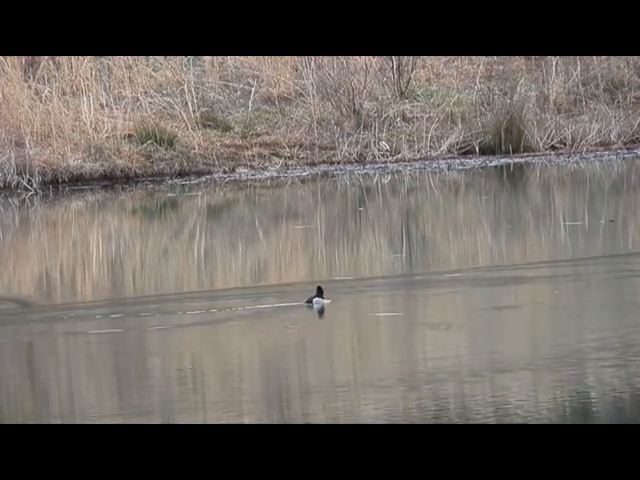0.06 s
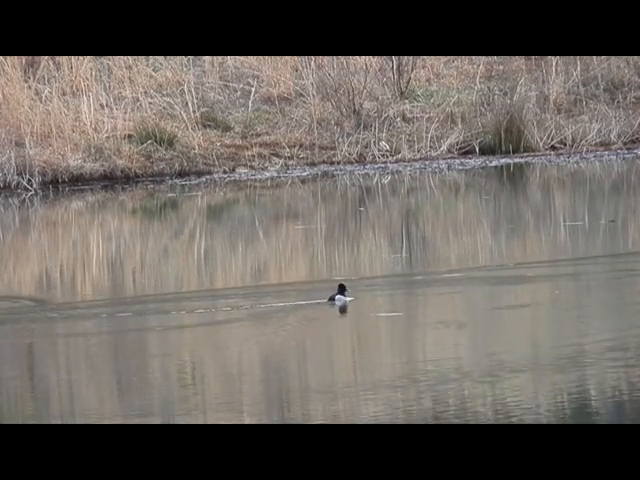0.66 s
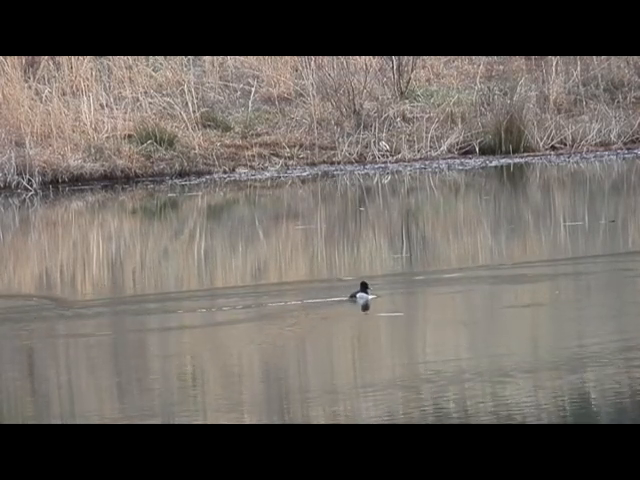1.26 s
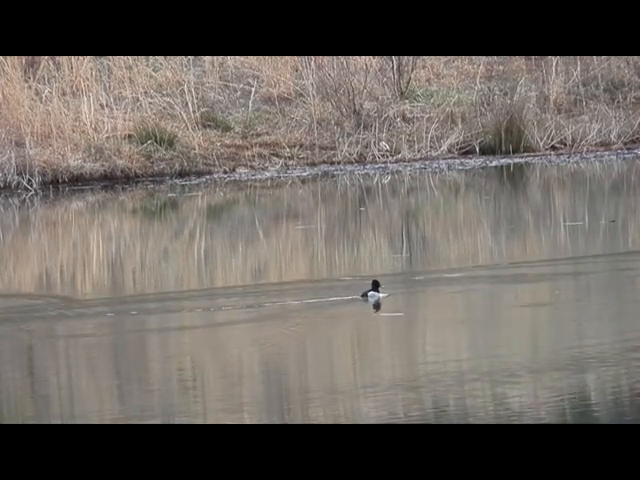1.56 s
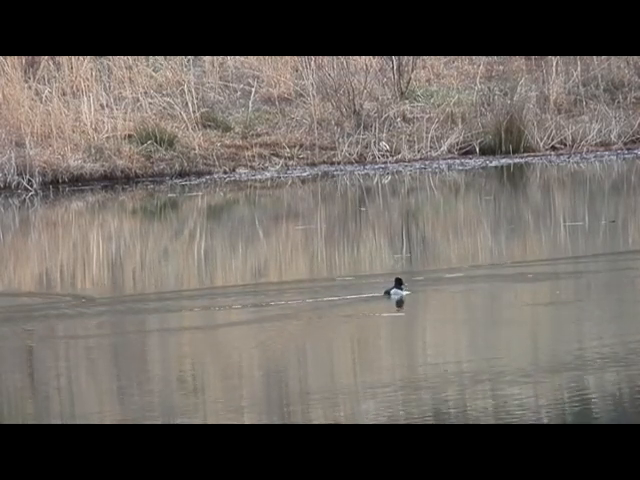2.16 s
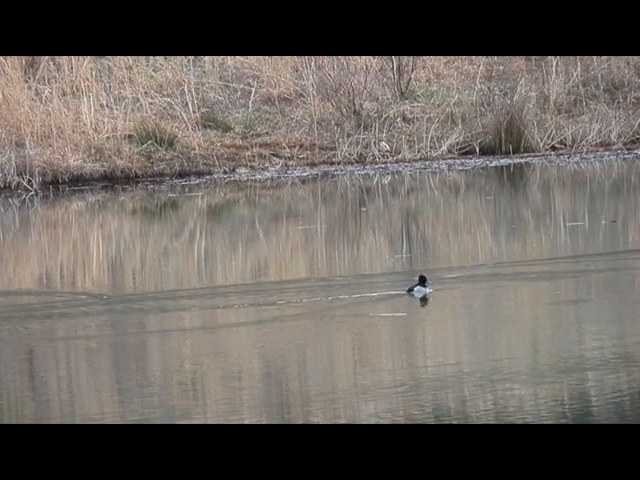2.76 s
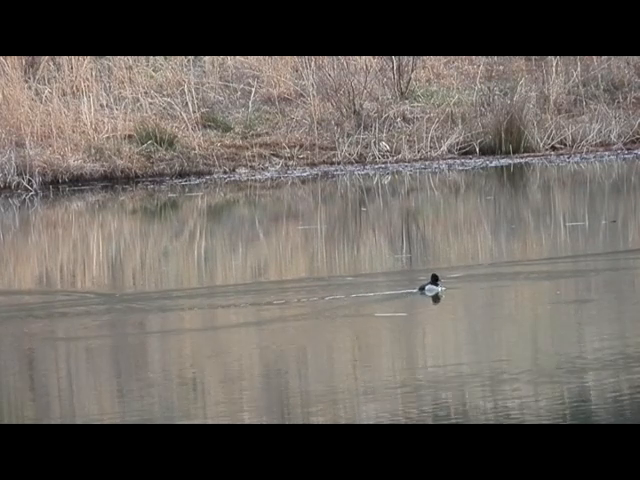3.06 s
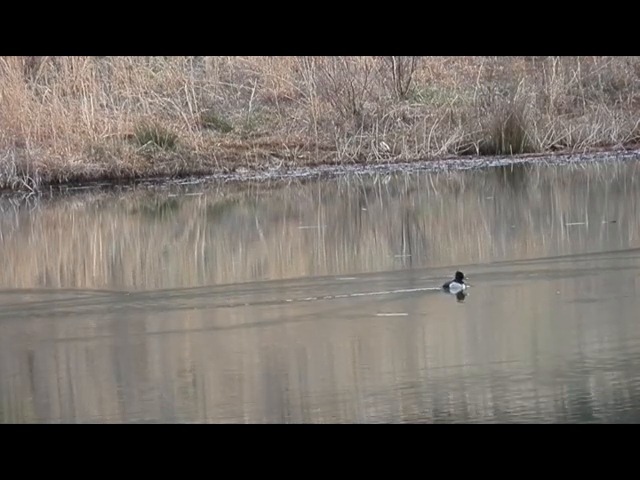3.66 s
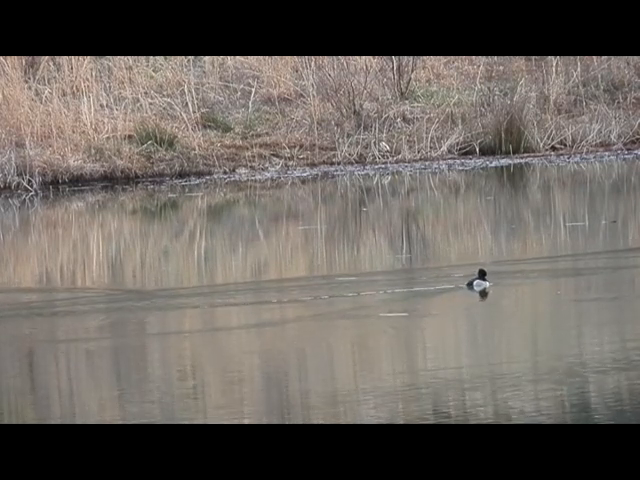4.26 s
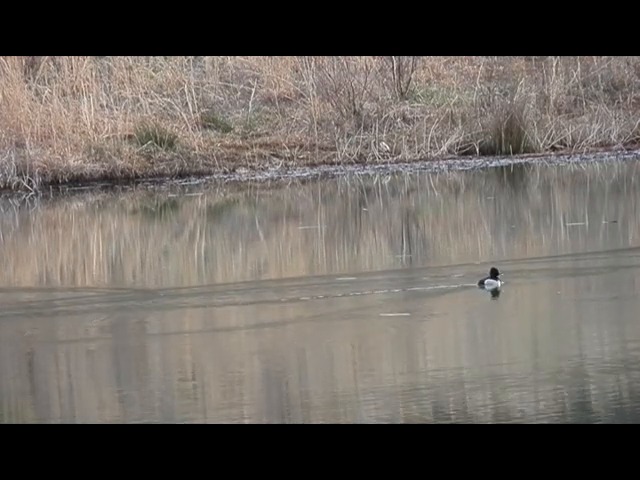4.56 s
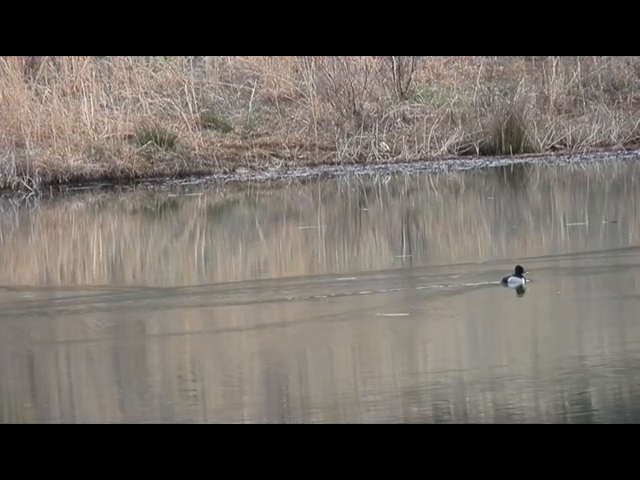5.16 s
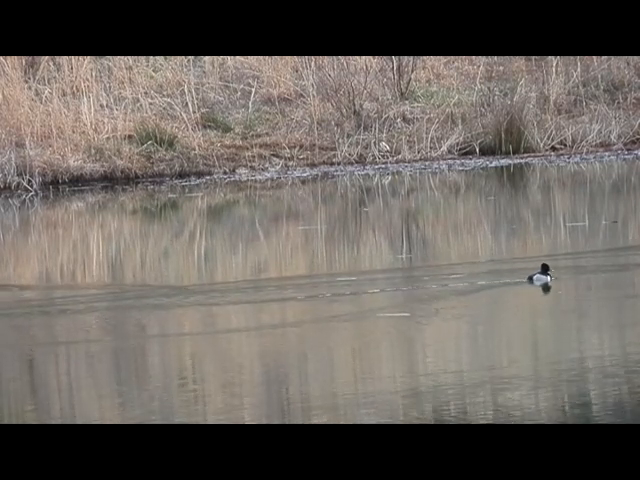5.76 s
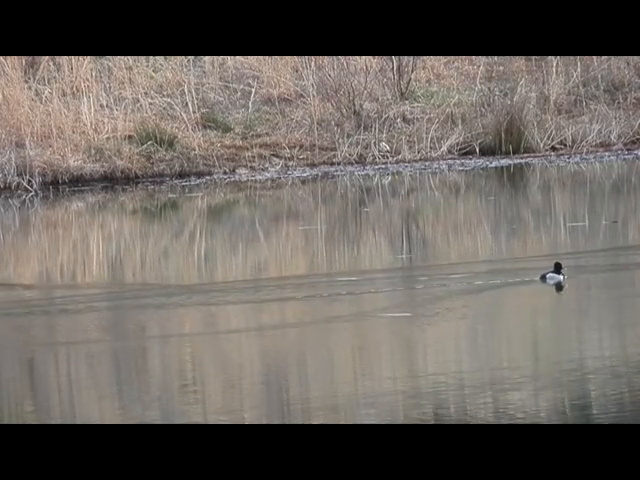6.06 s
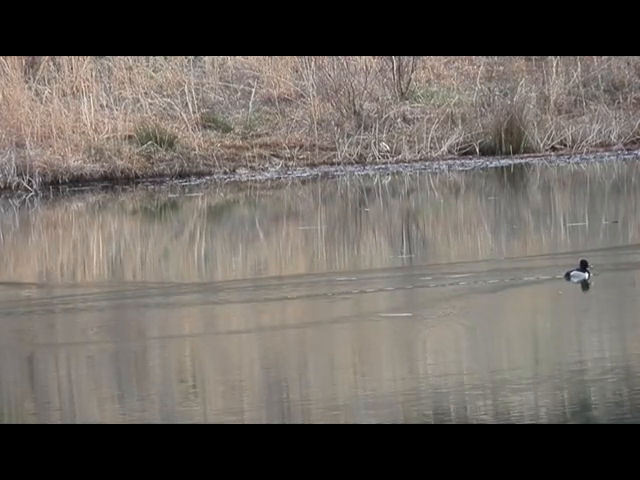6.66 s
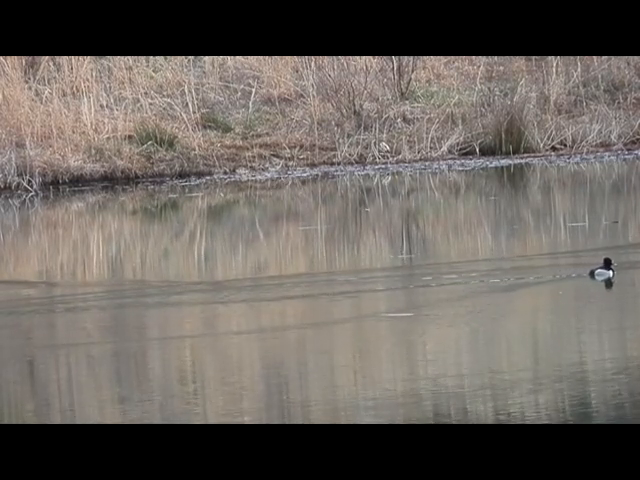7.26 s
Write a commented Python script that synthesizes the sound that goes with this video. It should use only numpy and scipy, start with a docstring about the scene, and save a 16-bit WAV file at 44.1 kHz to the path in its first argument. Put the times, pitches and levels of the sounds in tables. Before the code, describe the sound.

Several toads trill throughout at a pond, their fast pulsing tones overlapping at slightly different pitches. Early on, a close sparrow sings one song: raspy chips, a buzz, quick pips, two loud diving whistles and sharp closing notes. A farther bird faintly repeats a falling call before the song and again afterwards. A few tiny bubbles plop, over a low distant rumble and thin hiss in the open air.

```python
"""Six toads trill around a pond, each vocal sac ringing in pulses at its own pitch and pace.
Close by, a sparrow's syrinx sings one song: raspy chips, a buzz, pips, flicks and steep whistles.
A farther bird repeats a falling slur among faint notes and rasps; bubbles plop at the water's edge.
Reeds and trees scatter the calls, over a whirr of far toads, a low distant rumble and a thin hiss."""
import sys
import numpy as np
from scipy import signal
from scipy.fft import rfft, irfft
from scipy.io import wavfile
from scipy.ndimage import uniform_filter1d

SR = 44100
rng = np.random.default_rng(int(sys.argv[2]) if len(sys.argv) > 2 else 0)


def unload_audio(sound):
    """Save the sound as a 16-bit wav file, at the path given as the first command line argument."""
    columns = np.transpose(np.atleast_2d(sound))
    # keep every value between -1 and 1, then stretch to whole-number steps
    steps = np.round(np.clip(columns, -1, 1) * 32767)
    wavfile.write(sys.argv[1], SR, steps.astype(np.int16))


N = 331632
TIME = np.arange(N) / SR
ALONG = np.linspace(0, 1, 48)   # position within a note, from start to end

# tone colours of the four noise beds: (frequency [Hz], relative density [dB])
RUMBLE_SPECTRUM = [(20, -7.5), (35, -2.5), (65, -0.5), (105, -0.5), (155, -1), (210, -6.5), (290, -16)]
FAR_NOISE_SPECTRUM = [(220, 2), (320, 0.5), (450, -3), (600, -7.5), (780, -8.5), (950, -19), (1150, -26)]
HISS_SPECTRUM = [(1100, 6), (1500, 9.5), (2000, -9), (3000, -7), (4000, -16), (5500, -9.5), (8000, -6.5),
                 (11000, -3), (14000, 0), (16500, -1)]
WHIRR_SPECTRUM = [(1300, -27), (1380, -8.5), (1440, -5.5), (1495, -7.5), (1555, -2.5), (1630, -4),
                  (1700, -22.5), (1780, -39.5)]
# the rumble's slow swell: (time [s], level [dB])
RUMBLE_LEVELS = [(0, -55), (1, -53), (2.5, -55), (4, -54.5), (5, -56), (6.2, -52.5), (7.5, -54.5)]
# bubbles at the water's edge: (time [s], pitch [Hz], level before the attack boost [dB])
BUBBLES = [(.5, 740, -66), (1.67, 780, -64.5), (4.465, 795, -62.5), (5.29, 830, -67), (5.694, 1082, -63),
           (5.697, 810, -62), (5.75, 1010, -65), (7.37, 1070, -68)]

# the far bird's slurs: (time [s], level [dB])
SLUR_CALLS = [(1.077, -70), (1.383, -68), (1.696, -68.5), (2.0, -67), (4.994, -69.5), (5.295, -66.5),
              (5.599, -66.5), (5.906, -67.5)]
# contour of one slur: (time offset [s], pitch [Hz], level offset [dB])
SLUR_SHAPE = [(-.02, 3097, -17), (.005, 2934, 3.5), (.048, 2908, 1.5), (.068, 2650, 3.5),
              (.095, 2184, -2.5)]
# faint notes from the trees:
# (time [s], length [s], start pitch [Hz], middle pitch [Hz], end pitch [Hz], level [dB], overtone [dB])
TREE_NOTES = [(3.616, 0.036, 2150, 2100, 1950, -59.5, -2), (5.742, 0.077, 2280, 2300, 2240, -67, -24),
              (6.38, .11, 7300, 7650, 8900, -71, -24)]
# runs of soft, distant rasps; the last is the far slur's fading echo:
# (time [s], count, spacing [s], pitch [Hz], level [dB], fade [dB/rasp])
FAR_RASPS = [(.08, 3, .13, 4190, -72.5, 2), (3.439, 1, .1, 2840, -68.5, 0),
             (3.721, 7, .114, 4170, -69, 1.6), (6.08, 3, 0.057, 2650, -70.5, 4)]

# one trill per toad: (start [s], end [s], rate [pulses/s], slowing [pulses/s^2])
TOAD_TRILLS = [(.016, 3.62, 17.98, .21), (3.678, 8.2, 19.34, .152), (.046, 8.2, 20.33, .076),
               (2.246, 8.2, 20.76, .288), (.006, 8.2, 17.0, .174), (4.44, 8.2, 19.03, .7)]
# the same toads' voices: (pitch [Hz], glide [Hz/s], level [dB], swell [dB/s], pulse length [s],
# fall within a pulse [Hz], 2nd harmonic [dB], 3rd harmonic [dB], echo [dB])
TOAD_VOICES = [(1420.5, -4, -47, -.5, .029, 38, -30, -24.5, -9.5),
               (1429, 4, -54, -0.2, 0.024, 60, -25, -35, -7),
               (1535, 3.5, -55.5, -0.1, .032, 49.5, -42.5, -33.5, -2),
               (1654, 2.5, -58.5, .5, 0.019, 70, -41.5, -41.5, -6),
               (1613, 0.67, -57.5, 0.04, .031, 45, -20.5, -28, -7),
               (1563, 4.5, -57, .1, 0.024, 55, -37, -28, -15)]

# the sparrow's two-voiced chips: (time [s], low voice [dB], high voice [dB])
CHIP_CALLS = [(1.458, -62.5, -56.5), (1.713, -56.5, -38.5), (1.84, -56.5, -49), (2.014, -52, -45.5)]
# contours of a chip's two voices: (time offset [s], pitch [Hz], level offset [dB])
CHIP_LOW_SHAPE = [(0, 3314, -9), (.013, 3263, 0.5), (.04, 3130, -5.5), (.07, 2880, -13)]
CHIP_HIGH_SHAPE = [(.012, 5660, -23), (.021, 5330, -9.5), (.033, 5490, -3.5), (.046, 5420, -5.5),
                   (.06, 5350, -8), (.07, 5510, -22.5)]
# two loud diving whistles: (time [s], length [s], top pitch [Hz], level [dB])
DIVE_NOTES = [(2.644, 0.076, 7700, -24), (3.082, 0.083, 7720, -21.5)]
# hooks, each a rise and then a short fall: (time [s], rise length [s], top pitch [Hz], snap [dB],
# crest [dB], fall time [s], fall pitch [Hz], fall depth [Hz], fall level [dB])
HOOK_NOTES = [(2.114, 0.036, 7580, -48.5, -44, 2.159, 5270, 595, -43),
              (3.504, 0.036, 8110, -42, -52, 3.546, 5760, 1710, -39.5),
              (3.687, 0.031, 7670, -49.5, -50.5, 3.724, 5380, 1680, -48.5),
              (3.901, 0.039, 7970, -61, -54, 3.942, 5560, 1600, -50)]
# soft linking notes: (time [s], length [s], start pitch [Hz], middle pitch [Hz], end pitch [Hz], level [dB])
LINK_NOTES = [(1.937, 0.062, 6380, 6550, 6850, -67), (2.741, 0.011, 4520, 4960, 5170, -47),
              (2.75, .044, 3520, 3650, 3490, -44), (2.778, .011, 4530, 4170, 3860, -52),
              (2.83, 0.22, 2600, 2419, 2523, -50.5), (3.015, .052, 7130, 7950, 7400, -63.5),
              (3.053, .012, 7600, 7200, 6400, -58.5), (3.201, .18, 3420, 3410, 3385, -52.5),
              (3.336, 0.023, 5730, 6170, 5600, -56), (3.398, 0.018, 4700, 5000, 5300, -62),
              (3.418, 0.022, 5500, 5980, 5500, -57.5)]
# up-and-down flicks: (time [s], top pitch [Hz], level [dB])
FLICK_NOTES = [(3.195, 4370, -51), (3.218, 3800, -49), (3.236, 3890, -44), (3.252, 3790, -46),
               (3.272, 4310, -48), (3.296, 3750, -47), (3.319, 3520, -50), (3.344, 3780, -51),
               (3.361, 3450, -51), (3.378, 3900, -58)]


def from_db(db):
    return 10 ** (np.asarray(db) / 20)


def unit_rms(x):
    return x / np.sqrt(np.mean(x ** 2) + 1e-20)


def drift(rate):
    """A random wobble that takes a new turn rate times a second."""
    knots = rng.standard_normal(8192)
    return np.interp(TIME * rate, np.arange(len(knots)), knots)


def noise_bed(spectrum):
    """Noise of rms 1 with the given tone colour, rolled off beyond both ends."""
    hz, db = np.transpose(spectrum)
    f = np.maximum(np.fft.rfftfreq(N, 1 / SR), 1)
    colour = from_db(np.interp(np.log(f), np.log(hz), db))
    roll_off = 1 / np.sqrt((1 + (f / hz[-1] / 1.1) ** 24) * (1 + (hz[0] / f) ** 6))
    return unit_rms(irfft(rfft(rng.standard_normal(N)) * colour * roll_off, N))


def banks(dry, echo_db, near_t60, far_t60, far_db):
    """Reeds scatter a sound at once; the trees behind give a longer, weaker tail."""
    t = TIME[:SR]
    decay = from_db(-60 * t / near_t60) + from_db(far_db - 60 * t / far_t60)
    echo = rng.standard_normal(len(t)) * decay * np.minimum(t / .0037, 1)
    return dry + from_db(echo_db) * signal.fftconvolve(dry, echo / np.linalg.norm(echo))[:N]


def rumble():
    """A deep, distant bed that swells slowly."""
    return from_db(np.interp(TIME, *np.transpose(RUMBLE_LEVELS))) * noise_bed(RUMBLE_SPECTRUM)


def air(far_db=-63.5, hiss_db=-63):
    """Steady far-off noise above the rumble, with a thin hiss on top."""
    return from_db(far_db) * noise_bed(FAR_NOISE_SPECTRUM) + from_db(hiss_db) * noise_bed(HISS_SPECTRUM)


def far_toads(level_db=-62.5):
    """Toads on the far shore merge into a steady whirr."""
    return from_db(level_db) * noise_bed(WHIRR_SPECTRUM)


def plops(t60=.044, attack_boost_db=13):
    """Each bubble rings briefly, rising a little in pitch."""
    out, t = np.zeros(N), TIME[:SR // 8]
    for s, hz, db in BUBBLES:
        envelope = from_db(db + attack_boost_db - 60 * t / t60) * np.minimum(t / .0008, 1)
        ring = envelope * np.sin(2 * np.pi * hz * t * (1 + .54 * t))
        start = int(s * SR)
        out[start:start + len(t)] += ring[:N - start]
    return banks(out, echo_db=-14.5, near_t60=.11, far_t60=.74, far_db=-20)


def sing(out, contour, flutter_hz=0, swing_hz=0, throb=0, rasp_hz=0, overtone_db=-24, damping_db=14):
    """Mix in a note along (time [s], pitch [Hz], level [dB]); the syrinx can add flutter and rasp."""
    s, hz, db = np.transpose(contour)
    s = np.sort(s)
    span = slice(int(s[0] * SR), int(s[-1] * SR))
    t = TIME[span]
    wander = np.interp(t, np.linspace(s[0], s[-1], 24), rng.standard_normal(24))
    tremble = unit_rms(uniform_filter1d(rng.standard_normal(SR // 2), size=24))[:len(t)]
    flutter = 2 * np.pi * np.cumsum(flutter_hz * (1 + .0393 * wander)) / SR
    swing = np.sin(flutter) + np.sin(2 * flutter) / 2   # the pitch snaps up and slides down
    pitch = np.interp(t, s, hz) * (1 + .0052 * wander) + swing_hz * swing + rasp_hz * tremble
    phase = 2 * np.pi * np.cumsum(pitch) / SR
    fades = np.clip(np.minimum(t - s[0], s[-1] - t) / .002, 0, 1)
    level = np.sqrt(2) * from_db(np.interp(t, s, db)) * fades * (1 - throb * np.cos(flutter))
    # the throat takes damping_db off the octave for every kHz that the note climbs above 5 kHz
    overtone = from_db(overtone_db - damping_db * np.maximum(pitch / 1000 - 5, 0))
    out[span] += level * (np.sin(phase) + overtone * np.sin(2 * phase))


def placed(shape, s, db):
    """A note shape cued at a time and a level."""
    return np.array(shape) + [s, 0, db]


def soft_note(s, length_s, start_hz, middle_hz, end_hz, db, attack_share=.2):
    """One smooth arc of pitch that swells and then fades; long notes fade further."""
    pitch = np.polyval(np.polyfit([0, .5, 1], [start_hz, middle_hz, end_hz], 2), ALONG)
    loss_db = np.interp(ALONG, [0, attack_share, 1], [14, 0, 9 + 50 * length_s])
    return np.c_[s + length_s * ALONG, pitch, db - loss_db]


def far_slurs(slap_s=.055, slap_db=-10):
    """A far bird's falling slurs, each with one distinct reflection from the trees."""
    out = np.zeros(N)
    for s, db in SLUR_CALLS:
        sing(out, placed(SLUR_SHAPE, s, db), rasp_hz=25.1, overtone_db=-43)
        sing(out, placed(SLUR_SHAPE, s + slap_s, db + slap_db), rasp_hz=25.1, overtone_db=-40.5)
    return banks(out, echo_db=-4, near_t60=.43, far_t60=2.2, far_db=-5.5)


def far_notes_and_rasps():
    """Stray notes and soft, distant rasps, blurred by the trees."""
    out = np.zeros(N)
    for *note, overtone_db in TREE_NOTES:
        sing(out, soft_note(*note, attack_share=.43), rasp_hz=40, overtone_db=overtone_db)
    for first_s, count, gap_s, hz, first_db, fade_db in FAR_RASPS:
        for k in range(count):
            s, db = first_s + k * gap_s, first_db - k * fade_db
            contour = [(s - .035, hz + 200, db - 6), (s, hz, db), (s + .04, hz - 200, db - 4.5)]
            sing(out, contour, flutter_hz=208.7, swing_hz=400, throb=.089, rasp_hz=120)
    return banks(out, echo_db=-7, near_t60=.32, far_t60=1, far_db=-5)


def pulse_times(start_s, end_s, rate, slowing, drag_s=.026, drag_pulses=3.7):
    """A trill slows steadily as the toad tires, and its last few pulses drag further."""
    length_s = end_s - start_s
    pulse = np.arange(int(rate * length_s - slowing * length_s ** 2 / 2) + 1)
    elapsed = (rate - np.sqrt(rate ** 2 - 2 * slowing * pulse)) / slowing
    return start_s + elapsed + drag_s * np.exp((pulse - pulse[-1]) / drag_pulses)


def toad(beats, hz, glide, db, swell, pulse_s, fall_hz, second_db, third_db, arch_hz=65, tilt_db=4):
    """The vocal sac rings once a pulse, strongest early; pitch arches and sags with the push of air."""
    age = TIME - beats[0]
    nearest = np.searchsorted((beats[1:] + beats[:-1]) / 2, TIME)
    place = np.clip((TIME - beats[nearest]) / pulse_s, -.5, .5)   # 0 at the middle of a pulse
    push = np.cos(np.pi * place)
    waver_hz = 9 * drift(20) + 14 * drift(240)
    pitch = hz + glide * age + arch_hz * (push - .85) - fall_hz * place + waver_hz
    phase = 2 * np.pi * np.cumsum(pitch) / SR
    grain_db = .68 * drift(18) + 1.07 * drift(200)
    envelope = push * from_db(db + swell * age - tilt_db * place + grain_db)
    tone = np.sin(phase) + from_db(second_db) * np.sin(2 * phase) + from_db(third_db) * np.sin(3 * phase)
    return np.sqrt(2) * envelope * tone


def toad_chorus():
    """Every toad sits in its own spot and has its own echo."""
    out = np.zeros(N)
    for trill, (*voice, echo_db) in zip(TOAD_TRILLS, TOAD_VOICES):
        call = toad(pulse_times(*trill), *voice)
        out += banks(call, echo_db, near_t60=.29, far_t60=.907, far_db=-8.5)
    return out


def chips(coupling_db=-19):
    """Each side of the syrinx gives a raspy voice; the low one modulates the high one, adding sidebands."""
    low, high = np.zeros((2, N))
    for s, low_db, high_db in CHIP_CALLS:
        sing(low, placed(CHIP_LOW_SHAPE, s, low_db),
             flutter_hz=278, swing_hz=207, throb=.4, rasp_hz=133, overtone_db=-8.5)
        sing(high, placed(CHIP_HIGH_SHAPE, s, high_db),
             flutter_hz=287, swing_hz=310, throb=.36, rasp_hz=220, overtone_db=-16)
    modulator = low / np.sqrt(uniform_filter1d(low ** 2, size=128) + 1e-10)
    return low + high * (1 + from_db(coupling_db) * modulator)


def band(x, low_hz, high_hz):
    return signal.sosfilt(signal.butter(4, [low_hz, high_hz], "band", fs=SR, output="sos"), x)


def buzz(start_s=2.178, length_s=.18, climb_s=.098, attack_s=.023, release_s=.03, source_db=-38.5):
    """A fast, wide flutter climbs and holds; the throat passes bands around the note and its octave."""
    source, t = np.zeros(N), length_s * ALONG
    pitch = np.interp(t, [0, climb_s], [5750, 6365])
    level_db = source_db + np.interp(t, [0, attack_s, length_s - release_s, length_s], [-11, 0, 0, -11])
    sing(source, np.c_[start_s + t, pitch, level_db],
         flutter_hz=175, swing_hz=662.5, throb=.23, rasp_hz=170, overtone_db=-12)
    return band(source, 4950, 7300) + band(source, 10000, 11400)


def pips(count=9, start_s=2.4075, gap_s=.0207, start_hz=3253, step_hz=33.2, level_db=-52):
    """A quick, regular run of pips that climbs in uneven steps."""
    out = np.zeros(N)
    for k in range(count):
        s = start_s + k * gap_s
        hz = start_hz + k * step_hz + 35 * rng.standard_normal()
        db = level_db + rng.standard_normal()
        sing(out, [(s - .008, hz + 140, db - 11), (s - .003, hz, db),
                   (s + .00209, hz - 40, db), (s + .01, hz + 80, db - 14.5)])
    return out


def sweep(top_hz, drop_hz, bend, glide_share=.3):
    """Pitch as the syrinx slackens: a steady glide, then a steep bend lasting that share of the note."""
    return top_hz - drop_hz * (glide_share * ALONG + (1 - glide_share) * np.exp((ALONG - 1) / bend))


def falling_note(s, length_s, top_hz, drop_hz, db, bend, steepness, lateness, edge_db=-38):
    """A downward sweep that swells to its loudest just before the bend."""
    swell = np.abs(np.sin(np.pi * ALONG ** lateness)) ** steepness + from_db(edge_db)
    return np.c_[s + length_s * ALONG, sweep(top_hz, drop_hz, bend), db + 20 * np.log10(swell)]


def rising_note(s, length_s, top_hz, snap_db, crest_db, rise_hz=3120):
    """The sweep in reverse, with two accents: the upward snap and the high crest."""
    snap = from_db(snap_db) * np.exp(-((ALONG - .11) / .12) ** 2)
    crest = from_db(crest_db) * np.exp(-((ALONG - .65) / .31) ** 2)
    pitch = sweep(top_hz, rise_hz, bend=.1)[::-1]
    return np.c_[s + length_s * ALONG, pitch, 20 * np.log10(snap + crest + 1e-6)]


def whistles(dive_drop_hz=3520, hook_fall_s=.02):
    """The sparrow's pure notes: dives, hooks and the soft notes between them."""
    out = np.zeros(N)
    for s, length_s, hz, db in DIVE_NOTES:
        dive = falling_note(s, length_s, hz, dive_drop_hz, db, bend=.15, steepness=2.5, lateness=1.91)
        sing(out, dive, overtone_db=-23, damping_db=13)
    for *rise, s, hz, depth_hz, db in HOOK_NOTES:
        sing(out, rising_note(*rise), overtone_db=-21)
        fall = falling_note(s, hook_fall_s, hz, depth_hz, db, bend=.2, steepness=.78, lateness=1.45)
        sing(out, fall, overtone_db=-21)
    for note in LINK_NOTES:
        sing(out, soft_note(*note), rasp_hz=25, overtone_db=-20.5)
    return out


def flicks():
    """Tiny raspy notes that whip up in pitch and straight back down."""
    out = np.zeros(N)
    for s, hz, db in FLICK_NOTES:
        contour = [(s - .007, hz * .7, db - 12), (s - .002, hz * .9, db), (s, hz, db - 2),
                   (s + .002, hz * .85, db - 2), (s + .005, hz * .66, db - 11)]
        sing(out, contour, rasp_hz=120, overtone_db=-16)
    return out


def sparrow():
    """One song, close and nearly dry: chips, a buzz, pips, two dives, flicks and three closing hooks."""
    song = chips() + buzz() + pips() + whistles() + flicks()
    return banks(song, echo_db=-14, near_t60=.11, far_t60=.92, far_db=-20)


def scene():
    """The pond mixed to mono."""
    toads = toad_chorus() + far_toads()
    background = rumble() + air()
    return (toads + background + sparrow() + far_slurs() + far_notes_and_rasps() + plops())[None]


def record(dry, cutoff_hz=16700):
    """A steep low-pass takes off the very top."""
    return signal.sosfilt(signal.ellip(12, .1, 70, cutoff_hz, fs=SR, output="sos"), dry)


dry = scene()
out = record(dry)
unload_audio(out)
```